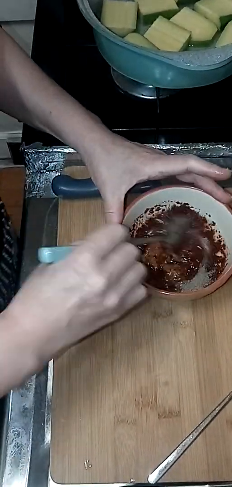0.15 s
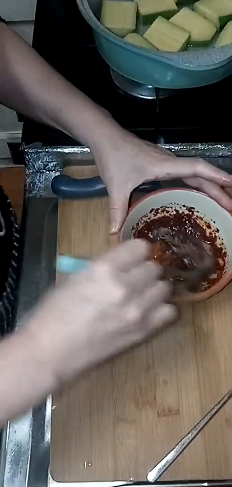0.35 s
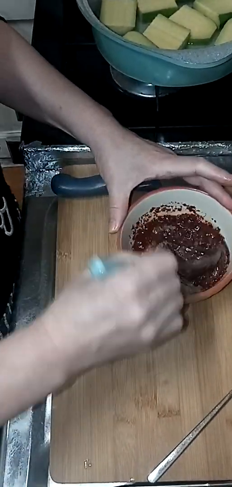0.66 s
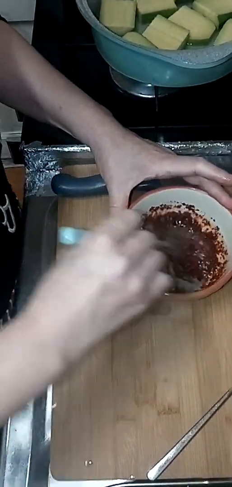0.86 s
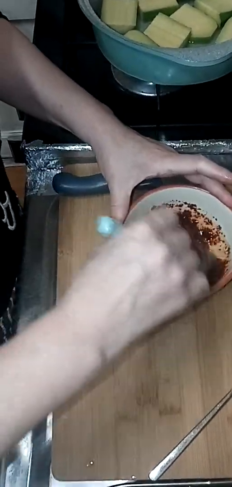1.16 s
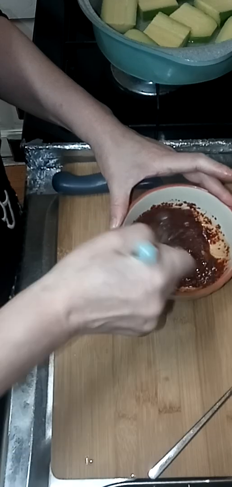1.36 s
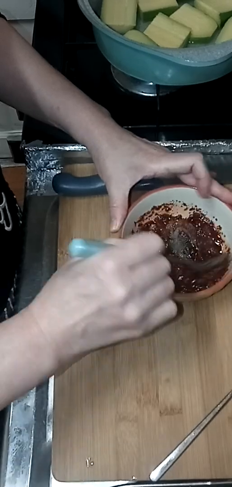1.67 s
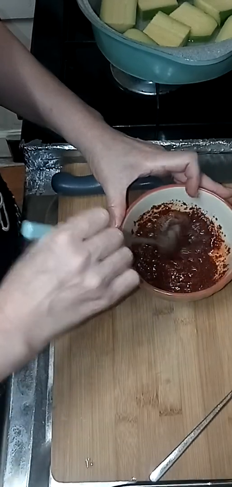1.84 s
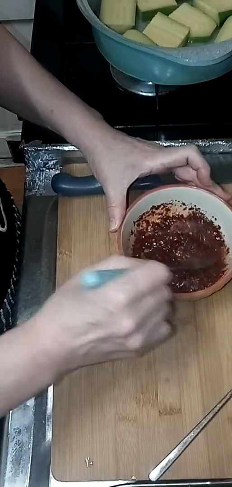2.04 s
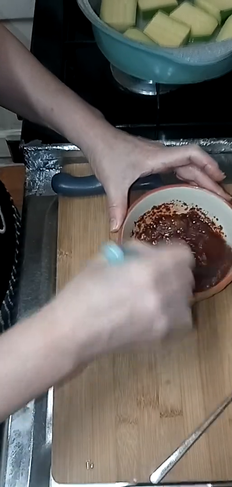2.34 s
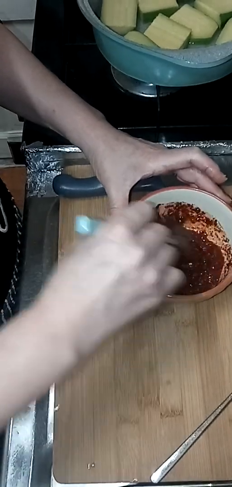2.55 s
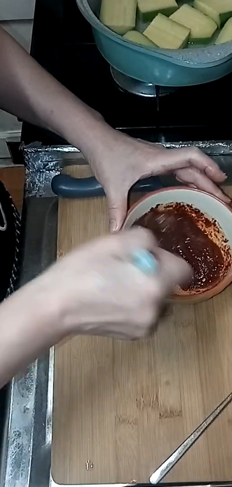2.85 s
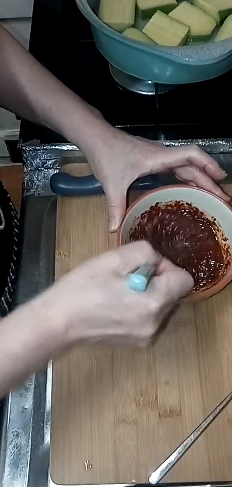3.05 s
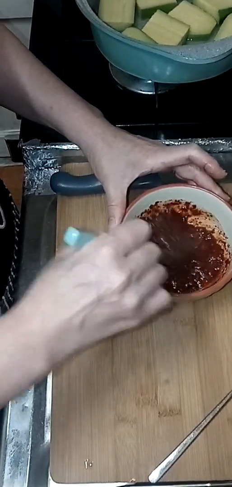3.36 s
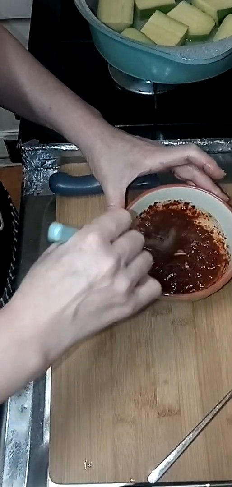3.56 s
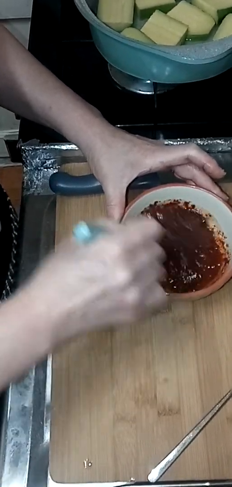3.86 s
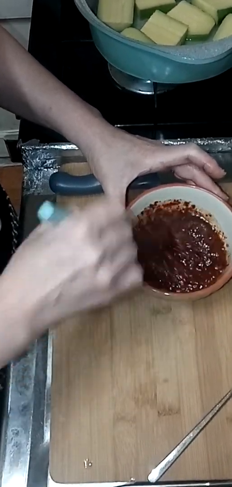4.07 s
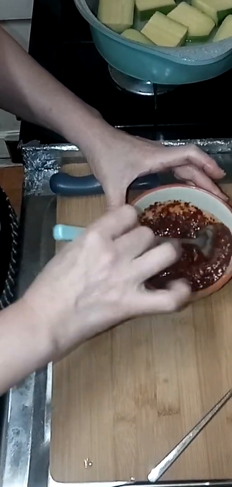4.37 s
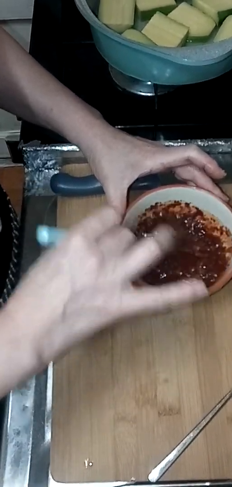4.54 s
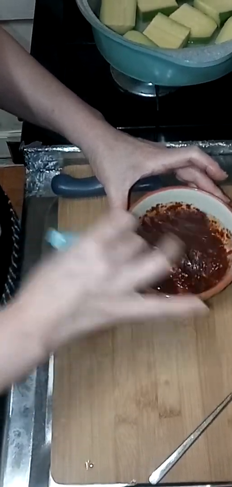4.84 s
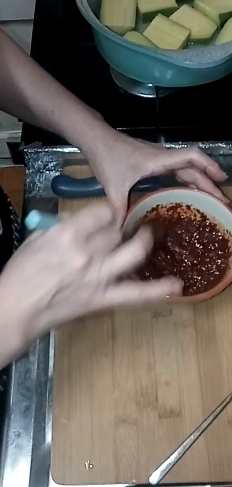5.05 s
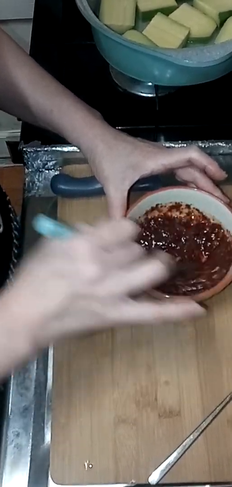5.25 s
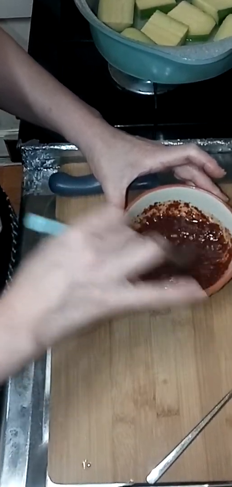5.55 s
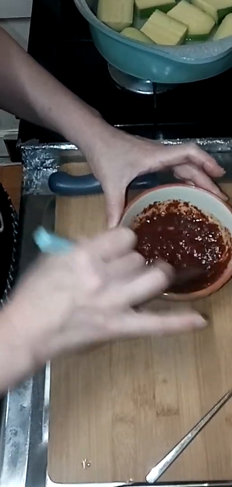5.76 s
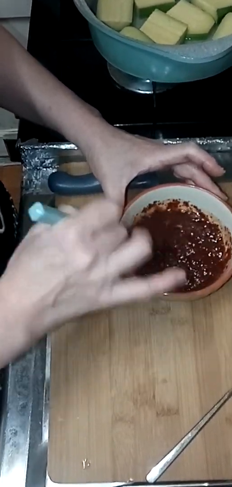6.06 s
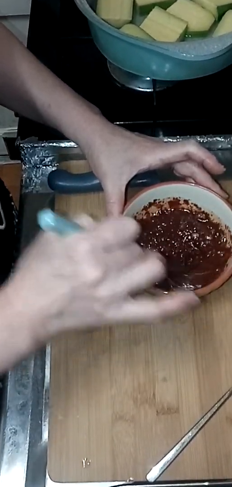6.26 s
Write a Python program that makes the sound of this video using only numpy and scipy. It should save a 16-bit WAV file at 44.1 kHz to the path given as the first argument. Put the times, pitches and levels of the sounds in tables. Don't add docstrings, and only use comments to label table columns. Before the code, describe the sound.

Close up in a small quiet kitchen, a steel spoon briskly stirs thick paste in a ceramic bowl. Soft scrapes come first, then sharp but damped clinks roughly three to five times a second, with short gritty rubs and little squeaks between them. The bowl's foot knocks lightly on a wooden board. Towards the end the scraping gets denser and wetter, with faint fizzing.

```python
import sys
import numpy as np
from scipy import signal
from scipy.fft import rfft, irfft, next_fast_len
from scipy.io import wavfile
from scipy.ndimage import uniform_filter1d, map_coordinates

SR = 44100
rng = np.random.default_rng(int(sys.argv[2]) if len(sys.argv) > 2 else 0)


def volts(x):
    e = np.asarray(x, float) / 20
    return 10 ** e


def transcribe(u):
    v = np.clip(np.atleast_2d(u).T, -1, 1)
    q = np.round(v * 32767).astype(np.int16)
    wavfile.write(sys.argv[1], SR, q)


N = 282681

# mode_hz, width_hz
OVAL_MODE = (864.3, 44)
# mode_hz, width_hz, level_db
WALL_MODES = [(1250, 40, 3), (1390, 110, 6.5), (1590, 61, 2.5), (1750, 69, 4), (2120, 180, 1),
              (2210, 75, 0), (2347, 102, 5), (2673, 410, 7.5), (3347, 81, -6), (3850, 260, -9),
              (3550, 25, -28.5)]
# mode_hz, level_db
SPOON_MODES = [(4130, -38), (4750, -3.5), (5200, -0.5), (5560, 5.5), (6200, 2.5), (6600, 0), (6900, 3.5),
               (7400, -3.5), (8600, -11), (9500, -11), (11150, -12.5), (11900, -20), (14300, -34)]
# mode_hz, width_hz, level_db
BOARD_MODES = [(327, 34, -11.5), (512.5, 29, -9.5), (632, 36, -9)]
SPOON_Q = 34


def unit(x):
    return x / np.sqrt(np.mean(x ** 2) + 1e-20)


def along(points, hz):
    f, v = np.transpose(points)
    return np.interp(np.log(hz + 1), np.log(f + 1), v)


def curves(rows):
    s, *columns = np.transpose(rows)
    return [np.interp(np.arange(N) / SR, s, c) for c in columns]


def spread(values):
    return [np.interp(np.arange(N) / SR, np.arange(len(v)) / 1000, v) for v in values]


def wobble(rate):
    return map_coordinates(rng.standard_normal(N // 100), [np.arange(N) * rate / SR])


def noise(spectrum):
    m = next_fast_len(N)
    white = rfft(rng.standard_normal(m))
    weight = volts(along(spectrum, np.fft.rfftfreq(m, 1 / SR)))
    return unit(irfft(white * weight, m)[:N])


def ring(force, hz, width_hz):
    r, w = np.exp(-np.pi * width_hz / SR), 2 * np.pi * hz / SR
    return signal.lfilter([np.sin(w)], [1, -2 * r * np.cos(w), r * r], force)


def near(hz, centre_hz, octaves, depth_db):
    return depth_db * (np.exp(-.5 * (np.log2(hz / centre_hz) / octaves) ** 2) - 1)


def band(x, lo_hz, hi_hz):
    sos = signal.butter(4, [lo_hz, min(hi_hz, 20000)], "band", fs=SR, output="sos")
    return signal.sosfilt(sos, x)


def radiated(wall, spoon, oval):
    return band(wall, 1080, 4100) + band(spoon, 3900, 16000) + band(oval, 700, 1020)


def pressure():
    # start_s, peak_s, scrape_db, region_hz, bright_db
    rim_presses = [(-0.02, 0.005, -31, 1513, -15.5), (0.442, 0.452, -45, 1411, -40),
                   (0.603, 0.66, -31.5, 1542, -8), (0.995, 1.003, -36, 1518, -17),
                   (1.015, 1.035, -38, 1399, -19), (1.35, 1.358, -36.5, 1901, -14.5),
                   (2.05, 2.075, -34.5, 1790, -4.5), (2.28, 2.322, -33, 1354, -21),
                   (2.44, 2.46, -26.5, 1613, -22), (2.79, 2.812, -40, 1330, 3.5),
                   (3.335, 3.352, -35, 1738, -33), (3.55, 3.606, -29, 1491, -19.5),
                   (4.0, 4.09, -30, 1681, -12), (4.7, 4.74, -38, 1596, -26), (5.03, 5.1, -30, 1800, -10),
                   (5.3, 5.36, -29.5, 1590, -11.5), (5.59, 5.648, -34.5, 1681, -29),
                   (5.83, 5.86, -34, 1344, -20), (6.022, 6.06, -29, 1612, -12.5),
                   (6.08, 6.11, -34.5, 1527, -7.5), (6.15, 6.24, -29.5, 1564, -8),
                   (6.16, 6.19, -35, 1400, -6)]
    # start_s, peak_s, scrape_db, region_hz, bright_db
    deep_presses = [(0.22, 0.28, -38, 1900, -17), (0.27, 0.32, -37.5, 1950, -16),
                    (0.31, 0.35, -39.5, 1950, -22), (4.887, 4.905, -27, 1704, -16),
                    (0.0, 0.045, -32, 1503, -7), (1.035, 1.058, -28.5, 1399, -37),
                    (1.62, 1.645, -38.5, 1527, -22), (2.03, 2.04, -25, 1713, -13),
                    (2.08, 2.11, -41.5, 1590, -15), (2.755, 2.783, -27.5, 1308, -15),
                    (3.52, 3.548, -30.5, 1852, -17.5), (4.15, 4.225, -26, 1750, -13),
                    (4.775, 4.796, -34.5, 1336, -22), (5.51, 5.52, -58.5, 1370, -31),
                    (4.09, 4.125, -35, 2300, -8), (3.132, 3.147, -49, 1640, -23),
                    (5.15, 5.19, -33, 2787, -5)]
    # start_s, lift_s, scrape_db, region_hz, bright_db
    drags = [
        (0.16, 0.395, -47.5, 1800, -14.5),
        (2.225, 2.3, -43, 1500, -14),
        (3.893, 3.95, -37, 1565, -6.5),
        (3.99, 4.2, -38, 1553, -26),
        (4.9, 5.135, -33, 1735, -18),
        (5.148, 5.225, -32, 1681, -15),
        (5.268, 5.39, -31.5, 1750, -16.5),
        (6.0, 6.2, -41.5, 1400, -23),
        (6.24, 6.42, -37, 1578, -11.5),
    ]
    # start_s, peak_s, scrape_db, region_hz, bright_db
    squeaks = [(1.035, 1.07, -25.5, 2250, -15), (1.065, 1.105, -25, 1958, -26),
               (1.283, 1.3, -43.5, 1390, -27), (1.295, 1.322, -42.5, 2900, -22),
               (1.315, 1.343, -43.5, 2700, -14), (3.285, 3.3, -34, 2050, -34.5),
               (3.305, 3.318, -33.5, 1750, -47), (3.335, 3.353, -31.5, 1786, -24),
               (4.495, 4.518, -22, 1800, -26), (4.515, 4.542, -24, 2095, -21.5),
               (4.888, 4.9, -27, 2300, -17), (0.132, 0.152, -40.5, 1740, -21), (5.07, 5.1, -36, 2860, -12)]
    # oval_db, board_db, rise power, focus (higher = narrower)
    kinds = [(rim_presses, (-3, -26.5, 1.83, 0)),
             (deep_presses, (-7.5, -26, 1.5, 0)),
             (drags, (-0.5, -26, 0.27, -0.5)),
             (squeaks, (-19.5, -36.5, 0.94, 0.5))]
    release_db_per_s, oval_lingers = 678.5, 0.27

    presses = [[*row, *kind] for rows, kind in kinds for row in rows]
    columns = np.transpose(presses)[..., None]
    start, peak, db, centre, bright_db, oval_db, drum_db, power, focus = columns
    t = np.arange(N * 1000 // SR + 2) / 1000
    rise = np.clip((t - start) / np.maximum(peak - start, .002), 1e-9, 1)
    release_db = release_db_per_s * np.maximum(t - peak, 0)
    loss_db = -20 * power * np.log10(rise) + release_db + 200 * (t < start)
    weight = volts(db - loss_db) ** 2 + 1e-30
    oval = volts(db + oval_db - (1 - oval_lingers) * loss_db) ** 2 + 1e-30
    level_db = 10 * np.log10(weight.sum(0) + 1e-12)
    oval_rel_db = 10 * np.log10(oval.sum(0)) - level_db

    def mean(v):
        return (v * weight).sum(0) / weight.sum(0)

    return spread([level_db, mean(centre), oval_rel_db, mean(bright_db), mean(drum_db), mean(focus)])


def scrape():
    focus_db, squeal_db, stutter_db = 8, 1, 5
    db, centre, oval_db, bright_db, drum_db, focus = pressure()
    ticks = (rng.random(N) < 3000 / SR) * rng.standard_normal(N)
    ticks = ticks * volts(np.minimum(3 * rng.exponential(size=N), 9))
    grit = unit(ticks) * volts(2 * wobble(70))

    def mode(gain_db, hz, w, patchy_db):
        rub = 0.7 * grit + 0.61 * rng.standard_normal(N)
        force = rub * volts(gain_db + patchy_db * wobble(40))
        return ring(ring(force, hz, 1.605 * w), hz, 2.33 * w) * (w / SR) ** 1.529 * 50

    tilt = 0.68 * np.clip(bright_db + 14.0, -15, 15)
    octaves, depth_db = .3 - 0.024 * focus, 6.5 + focus_db * focus
    wall = 0
    for hz, w, level in WALL_MODES:
        gain_db = db + level + near(hz, centre, octaves, depth_db) + tilt * np.log2(hz / 1700)
        wall = wall + mode(gain_db, hz, w, patchy_db=3)
    spoon = sum(mode(db + bright_db + level + 1, hz, hz / (2 * SPOON_Q), patchy_db=4.0)
                for hz, level in SPOON_MODES)
    oval = mode(db + oval_db, *OVAL_MODE, patchy_db=-1.0)

    turn = 2 * np.pi * np.cumsum(centre * (1 + 0.03 * wobble(90))) / SR
    squeak_db = db - 5.0 + squeal_db * focus + 1.5 * wobble(73) + stutter_db * wobble(220)
    squeak = volts(squeak_db - 0.23 * np.maximum(bright_db + 36.0, 0)) * np.sin(turn)

    drum = mode(db + drum_db, *BOARD_MODES[1][:2], patchy_db=2.5)
    drum = drum + mode(db + drum_db - 2, *BOARD_MODES[2][:2], patchy_db=7)
    bowl = radiated(volts(-7.0) * wall, volts(-12.5) * spoon, volts(1.0) * oval)
    return bowl + band(squeak, 1080, 4100) + drum + volts(db - 12) * band(grit, 1250, 3400)


def board():
    # land_s, thud_db, wood_db
    rocks = [(0.0, -50, -35), (0.22, -83, -62), (0.389, -63, -39.5), (0.622, -52, -43.5),
             (0.793, -58.5, -40), (1.011, -71, -39.5), (1.245, -78, -46.5), (1.364, -60, -44),
             (1.629, -51, -49.5), (1.803, -49.5, -30), (2.031, -42.5, -35), (2.23, -60.5, -51),
             (2.412, -53.5, -33.5), (2.685, -57.5, -49), (2.839, -43, -39), (2.93, -49, -57),
             (3.129, -56, -61), (3.252, -58, -39.5), (3.507, -52.5, -30.5), (3.771, -59.5, -35),
             (3.909, -54, -48), (4.12, -90.5, -49), (4.439, -55.5, -28.5), (4.508, -64, -37.5),
             (4.74, -64, -61), (5.159, -53, -55), (5.549, -54.5, -45), (5.61, -58, -36.5),
             (5.802, -68, -42.5), (5.97, -46, -44), (6.12, -77, -48), (6.27, -82, -55)]
    # freq_hz, level_db
    thud_spectrum = [(18, -52.5), (30, -31.5), (54, -22), (102, -3), (121, -0.5), (140, -7), (220, -29),
                     (290, -34), (480, -120)]
    # freq_hz, level_db
    wood_spectrum = [(110, -51), (190, -14), (231, -3), (273, -9.5), (308, 7), (442, -12), (556, -7.5),
                     (750, -11.5), (980, -50.5), (1650, -120)]
    land_db_per_s, thud_fade_db_per_s, wood_fade_db_per_s = 1102, 153.5, 258

    s, thud, wood = np.transpose(rocks)[..., None]
    since = np.arange(N * 1000 // SR + 2) / 1000 - s

    def fading(db, rate):
        return np.max(db - np.where(since < 0, -land_db_per_s, rate) * since, axis=0)

    thud_db, wood_db = spread([fading(thud, thud_fade_db_per_s), fading(wood, wood_fade_db_per_s)])
    low = volts(thud_db + 3.1 * wobble(40)) * noise(thud_spectrum)
    return low + volts(wood_db - 7.0 + 2.5 * wobble(44)) * noise(wood_spectrum)


def paste():
    # time_s, level_db
    fizz = [(0.0, -78), (0.18, -76), (1.0, -86.5), (1.52, -69.5), (1.73, -73), (1.84, -84), (2.25, -91),
            (2.5, -91.5), (3.21, -82), (3.43, -72), (4.12, -74), (4.3, -82), (4.75, -87), (5.09, -66),
            (5.6, -64), (6.0, -75), (6.21, -62), (6.41, -63)]
    # freq_hz, level_db
    bubble_spectrum = [(2590, -67), (4400, -40.5), (4970, -16), (6130, 0.5), (6570, -3), (7520, -27.5),
                       (9000, -37), (11700, -47.5), (19800, -120)]
    level_db = np.minimum(curves(fizz)[0], -69)
    return volts(level_db + 1.5 * wobble(60)) * noise(bubble_spectrum)


def hush():
    # freq_hz, level_db
    hush_spectrum = [(18, -36.5), (30, -8), (131, 1), (275, -3.5), (860, -6), (1500, 2.5), (2700, -6),
                     (4610, -22), (10700, -22), (16400, -27.5)]
    return volts(-72.5) * noise(hush_spectrum)


def clinks():
    # hit_s, peak_db, region_hz, oval_db,
    # bright_db
    blows = [(0.78, -5.5, 2100, -10.5, -14.5), (1.617, -21, 1590, -26, -22),
             (1.786, -2.5, 1640, -14.5, -19), (2.011, -5, 1655, -17, -19), (2.214, -13, 3460, -15, -23),
             (2.401, -8.5, 1375, -5, -16), (3.235, -7.5, 1250, -7.5, -22), (3.489, -7.5, 1680, -11, -22.5),
             (3.756, -7, 1410, -11.5, -20), (3.887, -15.5, 1360, -0.5, -17.5),
             (4.423, -6.5, 2230, -12.5, -20), (4.673, -21, 1500, -16, -22), (4.887, -21, 2080, -22, -39),
             (5.141, -7.5, 1240, -23, -28), (5.486, -19, 1400, -25, -28), (5.648, -22, 1950, -16, -21),
             (5.955, -8, 1500, -6.5, -16.5), (6.062, -31, 1575, 2, -17)]
    # hit_s, peak_db, region_hz, oval_db, bright_db
    touches = [(0.142, -46, 1750, -26, -35), (0.161, -35, 1830, -18, -14.5), (0.291, -38, 1980, -18, -39),
               (0.451, -41, 1250, -6, -44), (0.475, -39, 1690, -14, -25), (0.487, -45, 2070, -40, -8),
               (2.779, -27.5, 1300, -17.5, -25), (0.995, -29, 2900, -32, -24),
               (1.179, -49.5, 2080, -29, -9), (1.225, -38, 2320, -18, -30), (1.353, -29, 1390, -6.5, -20),
               (1.567, -50, 1950, -33, -5.5), (5.766, -46, 3180, -29, -10), (3.289, -26.5, 2190, -16, -40),
               (3.345, -28, 1780, -27, -32), (3.147, -47.5, 1730, -14.5, -19), (4.621, -35, 3360, -78, -15),
               (4.738, -27, 1791, -42, -32), (4.789, -32.5, 1200, -12, -21.5), (5.59, -39, 1230, 8.5, -37),
               (5.779, -45.5, 1100, 3.5, -30), (5.852, -32, 1300, -7, -20.5)]
    # hit_s, peak_db, region_hz, oval_db, bright_db
    slams = [
        (2.824, -13, 1360, -8, -27.5),
        (4, -54, 1700, -25, -13),
    ]
    slam_hz, slam_width_hz, slam_ring_db = 687, 74, 10.9

    hits = np.array(blows + touches + slams)
    at = np.round((hits[:, 0] + .0002) * SR).astype(int)
    _, db, centre, oval_db, bright_db = hits.T
    slam = np.arange(len(at)) >= len(blows + touches)
    knock_db = -32 + 0.91 * (db + 4) + 0.55 * (oval_db + 17) - db + 5.5 * slam
    luck = rng.standard_normal((len(at), 60))
    hard = 1 / (1 + np.exp(-(db + 18) / 3))
    focus = 1 + 0.8 * (1 - hard)
    rub = rng.standard_normal(N)

    def fade(x, s):
        return signal.lfilter([1], [1, -np.exp(-1 / (s * SR))], x)

    def blow(level_db, k):
        size = volts(level_db + 0.7 * luck[:, k])
        drag = fade(fade(np.bincount(at, size * (1 - hard), N), 0.0008), 0.0039)
        impulse = np.bincount(at, size * hard * np.sign(luck[:, -1 - k]), N)
        return impulse + volts(-43) * drag * np.roll(rub, 997 * k)

    def steep(force, hz, w):
        return ring(ring(force, hz, 1.71 * w), hz, 5 * w) * w / SR * 30

    def chatter(level_db, s):
        return fade(np.bincount(at, hard * volts(level_db), N), s) * rng.standard_normal(N)

    wall = 0
    for k, (hz, w, level) in enumerate(WALL_MODES):
        touch_db = focus * near(hz, centre, octaves=0.18, depth_db=7.5)
        wall = wall + steep(blow(db + level - 7.0 + touch_db, k), hz, 1.115 * w)
    spoon = sum(steep(blow(db + bright_db + level - 6, k), hz, hz / SPOON_Q)
                for k, (hz, level) in enumerate(SPOON_MODES, 11))
    wood = sum(ring(blow(db + knock_db + level + 1.5, k), hz, w)
               for k, (hz, w, level) in enumerate(BOARD_MODES, 24))
    slam_db = db + knock_db + slam_ring_db - 100 * ~slam
    wood = wood + ring(blow(slam_db, 28), slam_hz, slam_width_hz)
    oval = ring(blow(db + oval_db, 27), OVAL_MODE[0], 0.93 * OVAL_MODE[1])

    rattle = band(chatter(db - 7, 0.0063), 720, 3295)
    rattle = rattle + band(chatter(db + bright_db - 10.5, 0.0063), 2400, 8350)
    rattle = rattle + band(chatter(db + bright_db - 16, 0.0014), 7300, 15000)
    rattle = rattle + band(chatter(db + knock_db + 5.5, 0.022), 317, 1250)
    return radiated(wall, spoon, oval) + band(wood, 186.7, 950) + rattle


def catches():
    # middle_s, peak_db, pitch_hz, length_s
    snags = [(0.151, -35, 1760, 0.021), (0.277, -39.5, 1900, 0.012), (0.342, -41.5, 1950, .012),
             (1.057, -26.5, 1400, .012), (1.091, -22, 2050, .012), (1.322, -36.5, 1390, 0.047),
             (1.317, -52, 3250, 0.034), (1.319, -46, 2650, 0.035), (1.309, -45, 2250, 0.02),
             (1.359, -35.5, 2300, 0.0081), (1.231, -64.5, 3900, 0.023), (2.785, -36, 1290, 0.018),
             (2.843, -33.5, 1420, .025), (3.154, -44, 1700, .016), (3.297, -33, 2200, 0.019),
             (3.326, -23.5, 1740, 0.0065), (3.352, -18, 1740, 0.01), (3.361, -25.5, 1700, 0.0067),
             (3.553, -31, 2250, .012), (3.569, -27.5, 1740, 0.0074), (3.599, -28.5, 1250, 0.016),
             (3.605, -31, 1750, .016), (3.78, -26, 1400, .02), (3.743, -46, 3400, .016),
             (4.074, -28, 1630, 0.0082), (3.745, -44, 1400, .016), (4.205, -26.5, 2350, .014),
             (4.903, -25, 2340, .026), (4.93, -30, 2350, .03), (4.935, -30, 1700, .02),
             (4.54, -25, 2000, .024), (5.09, -32, 2890, .024), (5.12, -30.5, 1600, 0.011),
             (5.175, -29, 3000, 0.021), (5.228, -28.5, 1400, .014), (4.742, -25, 1790, .008),
             (5.306, -28, 1730, 0.011), (5.334, -26.5, 1740, 0.0069), (5.35, -30, 1640, 0.0064),
             (5.369, -24.5, 1590, 0.012), (5.767, -51.5, 3300, 0.013), (6.038, -33.5, 1640, 0.0098),
             (6.065, -30, 1610, 0.01), (6.103, -32.5, 1430, 0.0093), (4.765, -33, 860, .08),
             (6.224, -29.5, 1580, 0.013), (6.285, -32.5, 1350, .012), (2.222, -27, 3380, .02),
             (2.833, -24, 700, .022), (2.832, -26, 1000, .016)]
    waver_rad, rough_db = .05, 3
    out, t = np.zeros(N + SR), np.arange(-SR // 10, SR // 10) / SR
    for s, db, hz, length in snags:
        drift, lumps = rng.standard_normal((2, len(t)))
        carrier = np.sin(2 * np.pi * hz * t + waver_rad * np.cumsum(drift))
        uneven = volts(db + rough_db * unit(uniform_filter1d(lumps, size=120)))
        shape = np.exp(-.5 * (t / (length / 3)) ** 2) * uneven
        out[round(s * SR) - SR // 10:][:len(t)] += shape * carrier
    return band(band(out[:N], 550, 4200), 500, 4600)


def pops():
    # start_s, peak_db, low_hz, high_hz
    pockets = [(0.91, -65, 9700, 13000), (0.922, -54, 9500, 13000), (3.9, -40, 6500, 11000),
               (2.96, -61, 8000, 15000), (0.53, -68, 6000, 12500), (6.168, -48, 6000, 7500),
               (0.64, -44, 3500, 10000), (0.66, -42, 3500, 10000), (2.77, -44, 5000, 7200),
               (2.79, -44, 5000, 7200), (5.643, -42, 3500, 6000), (5.853, -44, 4500, 7000),
               (3.345, -40, 5200, 7000), (3.352, -46, 3400, 4200)]
    decay_s = .005
    out, t = np.zeros(N + SR), np.arange(SR // 20) / SR
    for s, db, lo_hz, hi_hz in pockets:
        crack = rng.standard_normal(len(t)) * np.exp(-t / decay_s)
        out[round(s * SR):][:len(t)] += volts(db) * band(crack, lo_hz, hi_hz)
    return out[:N]


def kitchen(x):
    # freq_hz, t60_s
    reverb_times = [(100, 0.25), (300, 0.64), (800, 0.23), (2000, 0.21), (5000, 0.19), (12000, 0.12)]
    out, phase = np.zeros(N), np.arange(N) / SR * 1.3
    for k in range(3):
        share = np.clip(1 - 3 * np.abs((phase + k / 3) % 1 - .5), 0, 1)
        hz, t, z = signal.stft(rng.standard_normal(SR // 2), SR, nperseg=256)
        decay = volts(-60 * t / along(reverb_times, hz)[:, None])
        tail = signal.istft(z * decay, SR, nperseg=256)[1]
        tail = np.pad(tail, (200, 0)) / np.linalg.norm(tail)
        out += signal.fftconvolve(x * np.sqrt(share), tail)[:N]
    return out


def scene():
    hits, rubs = clinks(), scrape()
    floor = board() + paste() + hush()
    rubs, snaps = rubs + catches(), pops()
    room = kitchen(volts(-8.5) * hits + volts(-14.5) * rubs + volts(-5) * snaps)
    return (hits + rubs + snaps + room + floor)[None]


def gate(x):
    gate_db, depth_db, window_s = -62, 1, 0.026
    low = band(x, 35, 1100)
    level_db = 10 * np.log10(np.abs(uniform_filter1d(x ** 2, int(window_s * SR))) + 1e-12)
    return x - low * (1 - volts(-depth_db / (7 + np.exp((level_db - gate_db) / 0.83))))


def roll_off(x):
    return signal.sosfilt(signal.butter(12, 16500, fs=SR, output="sos"), x)


def record(dry):
    mix = gate(band(dry, 35, 16200))
    return roll_off(mix)


dry = scene()
out = record(dry)
transcribe(out)
```